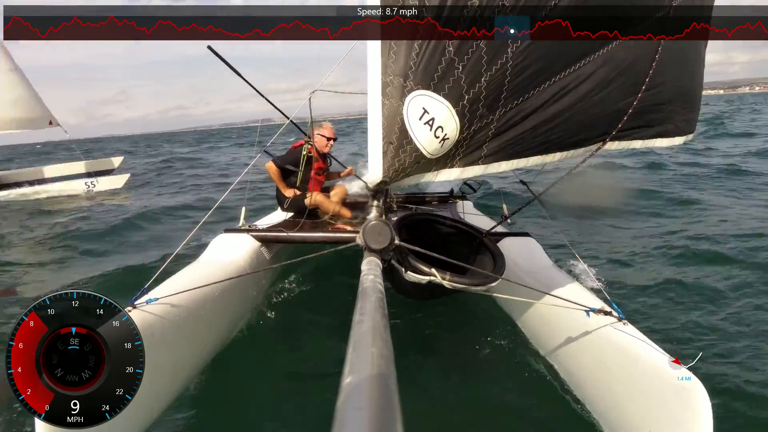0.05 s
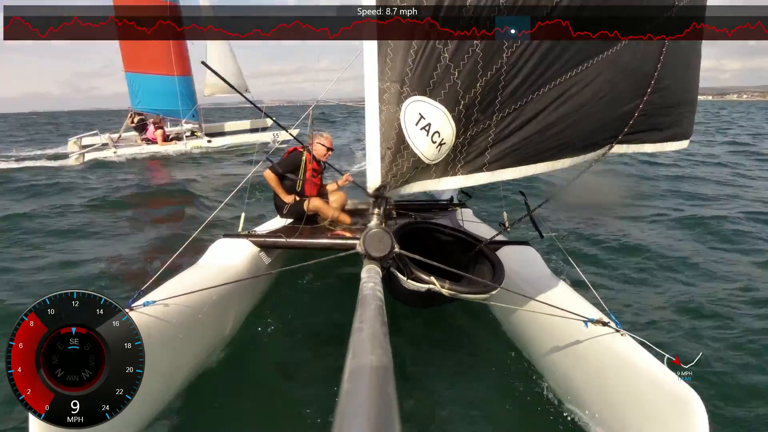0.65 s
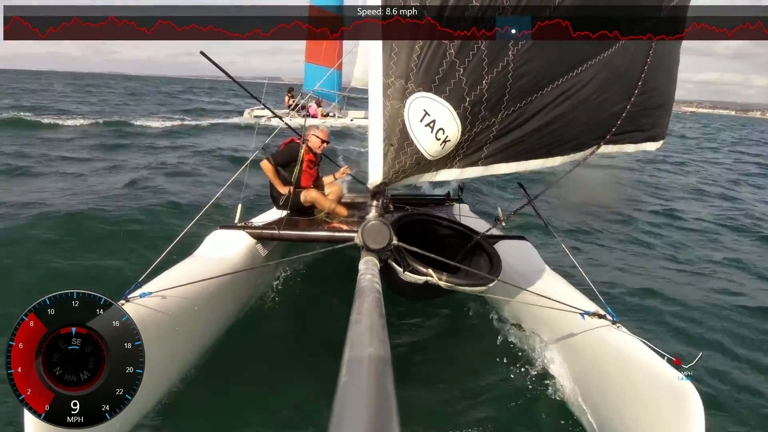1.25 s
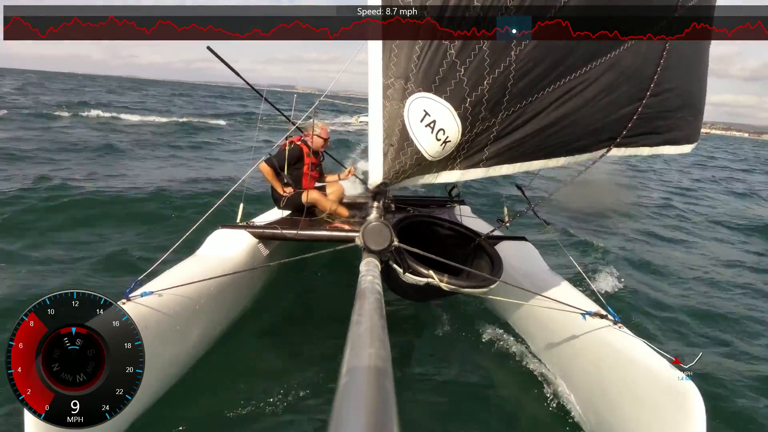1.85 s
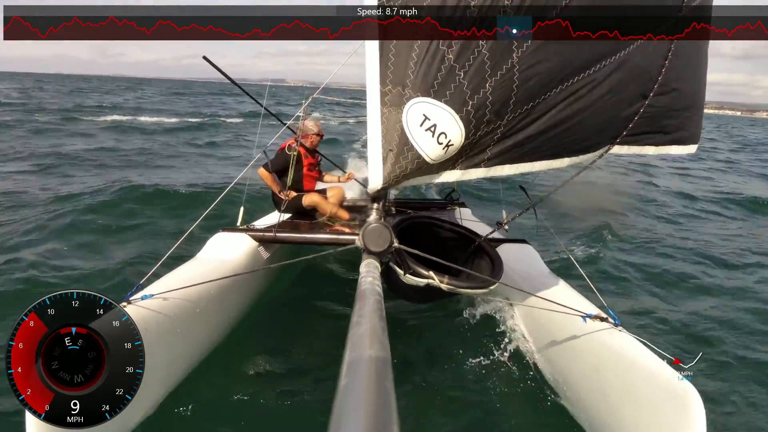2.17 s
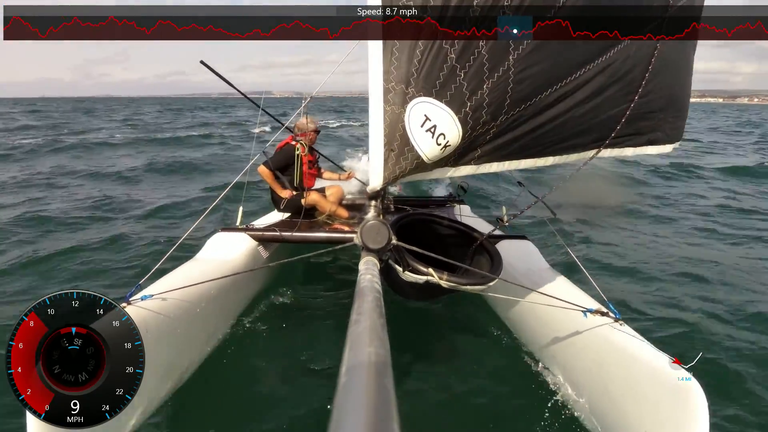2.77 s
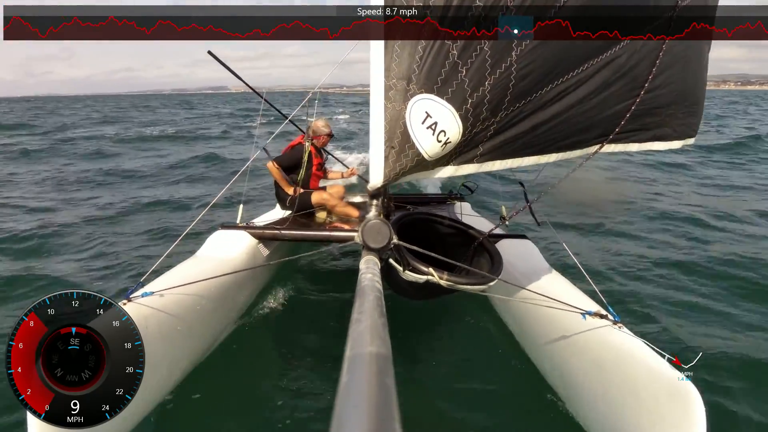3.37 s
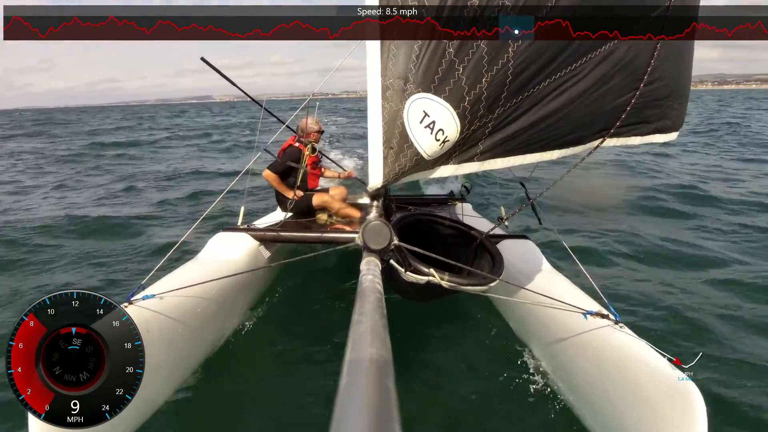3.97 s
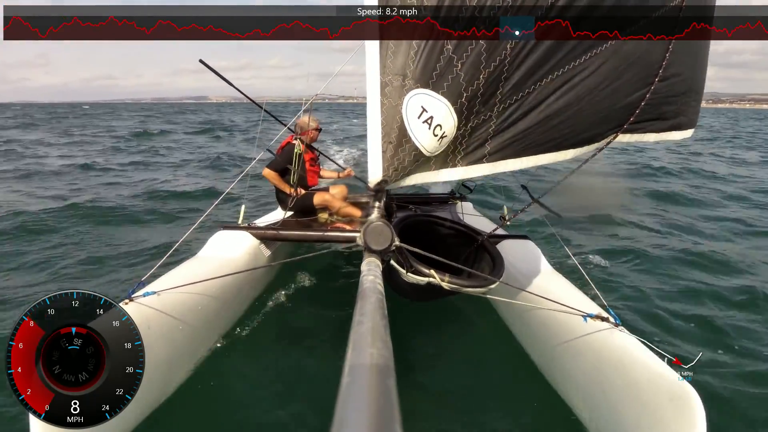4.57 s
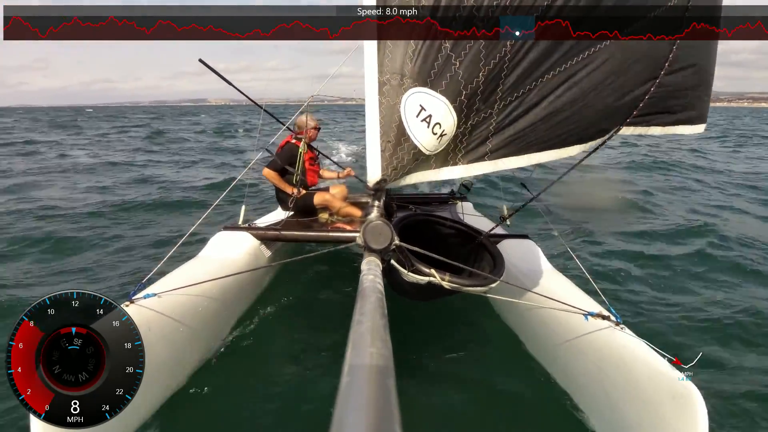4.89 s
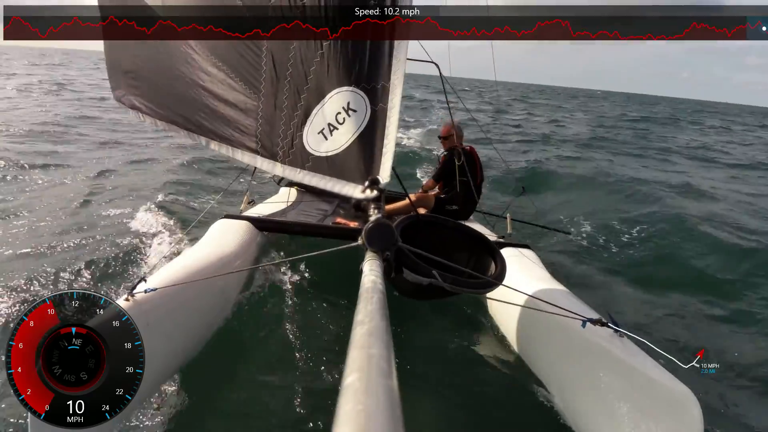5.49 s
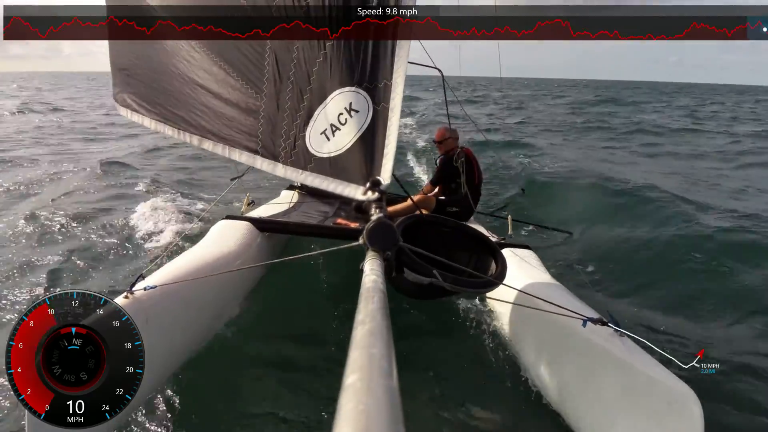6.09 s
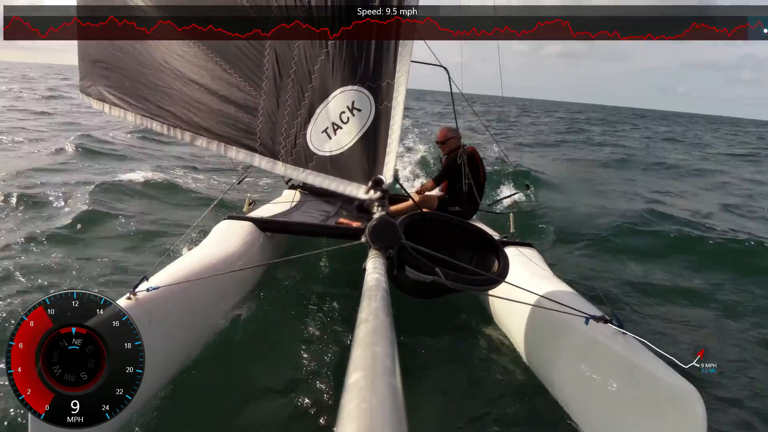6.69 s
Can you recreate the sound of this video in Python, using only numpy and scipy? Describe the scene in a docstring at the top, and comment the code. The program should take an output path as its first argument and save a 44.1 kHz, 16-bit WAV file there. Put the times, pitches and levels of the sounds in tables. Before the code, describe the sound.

Water hits a microphone housing in bursts of hollow, ringing taps and thuds, with low wind rumble and faint sea wash underneath.

```python
"""A small catamaran drives through choppy sea, heard inside a waterproof camera case on a pole between
the bows. At first wind buffets the case and the wash comes through muffled. From 0.5 s to 2.4 s volleys
of spray excite the modes of its shell and heavier lumps thump it on its mount; hard hits overload the
microphone and make its gain control duck. A lull follows, with crests bursting on the hulls and
scattered hits. More volleys land from 5 s to 5.9 s, then wind, wash and a few last hits remain."""
import sys
import numpy as np
from scipy import signal
from scipy.fft import rfft, irfft
from scipy.io import wavfile
from scipy.ndimage import uniform_filter1d

SR = 44100
rng = np.random.default_rng(int(sys.argv[2]) if len(sys.argv) > 2 else 0)


def wav_record(signal):
    """Record a signal, one row per channel, as 16-bit PCM in the file named by sys.argv[1]."""
    frames = np.transpose(np.atleast_2d(signal))
    bounded = np.clip(frames, -1, 1)
    # unit amplitude maps onto the largest positive 16-bit level
    quanta = np.round(bounded * 32767).astype(np.int16)
    wavfile.write(sys.argv[1], SR, quanta)


N = 297229
TIME = np.arange(N) / SR
HIT_TIME = TIME[:SR // 10]
SHELL_HZ = 1138   # nominal pitch, between the two lowest modes of the case wall


def from_db(db):
    """Amplitude ratio of a level in decibels."""
    return 10 ** (np.asarray(db) / 20)


def unit_rms(x):
    """Normalisation to rms 1."""
    return x / np.sqrt(np.mean(x ** 2) + 1e-20)


def unit_height(x, size):
    """Normalisation to amplitude 1 over the strongest `size` samples."""
    return x / np.sqrt(2 * uniform_filter1d(x ** 2, size).max() + 1e-20)


def cut(x, hz, kind, order=2):
    """Causal Butterworth high- or low-pass."""
    return signal.sosfilt(signal.butter(order, hz, kind, fs=SR, output="sos"), x)


def resonance(x, hz, width_hz):
    """Damped oscillator: two poles, gain 1 at the peak."""
    r = np.exp(-np.pi * width_hz / SR)
    feedback = [1, -2 * r * np.cos(2 * np.pi * hz / SR), r * r]
    return signal.lfilter(np.array([1, 0, -1]) * (1 - r * r) / 2, feedback, x + 1e-18)


def drift(corner_hz):
    """Slow random fluctuation: low-passed noise, rms 1."""
    hz = np.arange(N // 2 + 1) * SR / N
    return unit_rms(irfft(rfft(rng.standard_normal(N)) / (1 + (hz / corner_hz) ** 2), N))


def noise(spectrum):
    """Spectrally shaped noise, rms 1."""
    hz, db = np.transpose(spectrum)
    bins = np.arange(1, N // 2 + 2) * SR / N
    gain = from_db(np.interp(np.log(bins), np.log(hz), db, left=-120, right=-120))
    return unit_rms(irfft(rfft(rng.standard_normal(N)) * gain, N))


def impulses(per_s, spread_db=0.0):
    """Poisson process: impulses of either sign, 0 to 2 * spread_db above unit size."""
    sizes = from_db(spread_db * np.minimum(rng.exponential(1, N), 2)) * rng.choice([-1, 1], N)
    return sizes * (rng.random(N) < per_s / SR)


def in_time(curve):
    """Linear interpolation of a curve at every sample."""
    return np.interp(TIME, *np.transpose(curve))


def swells(rows):
    """Sum of Gaussian envelopes, each at 1/e one half duration from its peak."""
    return sum(from_db(db) * np.exp(-((TIME - s) / half_s) ** 2) for s, db, half_s in rows)


def held_excess_db(x, threshold_db, share, fall_db_per_s):
    """Peak hold with linear decay, on a share of the level above a threshold."""
    level_db = 10 * np.log10(np.maximum(uniform_filter1d(x ** 2, size=220), 1e-12))
    excess_db = share * np.maximum(level_db - threshold_db, 0)
    fall_db = fall_db_per_s * TIME
    return np.maximum.accumulate(excess_db + fall_db) - fall_db


def add(out, s, sound):
    """Superposition of a sound at time s."""
    start = max(round(s * SR), 0)
    out[start:start + len(sound)] += sound[:N - start]


def impact(contact_s, runoff_s, spatter_db, rise_s=0.00081, spatter_s=0.0061):
    """Momentum transfer from landing water: a force that builds, churns, then decays into spatter."""
    build = np.minimum(HIT_TIME / rise_s, 1) ** 2
    after = np.maximum(HIT_TIME - rise_s - contact_s, 0)
    decay = np.exp(-after / runoff_s) + from_db(spatter_db) * np.exp(-after / spatter_s)
    return build * decay * rng.standard_normal(len(HIT_TIME))


def shell(force, hz, width_hz):
    """Forced vibration of the case wall: a main mode below hz and a weaker one above."""
    main = resonance(force, hz * 0.932, width_hz)
    partner = from_db(-9) * resonance(force, hz * 1.168, 327)
    return cut(cut(main - partner, 802, "high", order=4), 1850, "low", order=3)


def crack(force):
    """Modal sum of the higher resonances; transmission loss in the wall removes the treble."""
    # higher modes of the case: f/Hz, bandwidth/Hz, relative level/dB
    case_modes = [(1750, 266, 4.5), (2090, 270, 10), (2605, 580, 4.5), (2883, 270, 5.5), (3420, 1200, 3),
                  (4060, 1600, -2.5), (6000, 800, -34)]
    ringing = sum((-1) ** k * from_db(db) * resonance(force, hz, width)
                  for k, (hz, width, db) in enumerate(case_modes))
    return cut(cut(ringing, 1550, "high", order=3), 2955, "low", order=5)


def swing(force, hz, width_hz):
    """Mass on a spring: the case swings for a few cycles on its mount."""
    motion = cut(resonance(force, hz, width_hz), 452, "low", order=4)
    return unit_height(cut(motion, 55, "high"), size=176)


def wind():
    """Turbulent pressure: gusts and puffs rumble while smaller eddies shake the case."""
    # gusts on the pole and shaking of the case: t/s, relative level/dB
    gusts = [(0.0, -43.5), (0.73, -33), (1.14, -31.5), (1.29, -62.5), (1.54, -38), (1.9, -36), (2.1, -39),
             (2.27, -45), (3.0, -44.5), (3.21, -40), (3.75, -44.5), (4.05, -50.5), (4.8, -46),
             (5.09, -24.5), (5.27, -33.5), (5.63, -35), (6.51, -38.5), (6.74, -45)]
    shaking = [(0.0, -37.5), (0.58, -35), (0.79, -26), (1.16, -27.5), (1.31, -36.5), (1.69, -32.5),
               (1.9, -24.5), (2.08, -22), (2.29, -30), (2.98, -39), (3.6, -37), (4.77, -34.5), (5.16, -27),
               (5.46, -16), (5.69, -21), (5.84, -30), (6.21, -32.5), (6.74, -31.5)]
    # puffs booming on the case: t/s, level/dB, half duration/s
    puffs = [(.21, -30, .03), (.65, -16, .025), (4.32, -24.5, 0.027), (4.47, -20.5, 0.01),
             (6.71, -23, 0.071)]
    # spectra of gusts and eddies: f/Hz, relative level/dB
    rumble_spectrum = [(20, -33), (32, -27.5), (42, -26.5), (55, -17.5), (72, -20), (92, -0.5), (120, -2),
                       (160, -7), (250, -23)]
    buffet_spectrum = [(90, -31.5), (125, -5.5), (160, 1.5), (195, -3.5), (230, 2), (290, -19.5),
                       (365, -7.5), (450, -24), (600, -27), (850, -33), (1300, -52)]
    rumble = (from_db(in_time(gusts) + 5 + 1.5 * drift(15)) + swells(puffs)) * noise(rumble_spectrum)
    buffet = from_db(in_time(shaking) + 2 + 3 * drift(27)) * noise(buffet_spectrum)
    return rumble + buffet


def bubbles(per_s=420, quality=7):
    """Bubble resonance: air beaten into the bow waves rings briefly, each size at its own pitch."""
    births = impulses(per_s)
    pitches_hz = np.geomspace(1150, 3000, 20)
    size_class = rng.integers(0, len(pitches_hz), N)
    rings = sum(resonance(births * (size_class == k), hz, hz / quality) / hz
                for k, hz in enumerate(pitches_hz))
    return unit_rms(cut(rings, 3600, "low", order=4))


def rushing_water():
    """Flow noise coloured by the case's resonances: the bow waves churn, the wake fizzes steadily."""
    # vigour of the bow waves and drone of the wash in the shell: t/s, relative level/dB
    rush = [(0, -62), (.35, -62), (.9, -54.5), (1.2, -66), (1.45, -67.5), (1.56, -57), (2.05, -54),
            (2.33, -64.5), (2.5, -57), (2.7, -58), (2.82, -64.5), (3.3, -63.5), (3.6, -68), (4.25, -64),
            (4.95, -68), (5.45, -53.5), (5.72, -73), (5.92, -62), (6.14, -59), (6.74, -60)]
    drone = [(0, -45.5), (.35, -50.5), (.55, -47), (1.0, -36.5), (1.55, -47), (2.0, -40.5), (2.4, -48),
             (3.25, -50.5), (3.55, -43.5), (4.05, -55), (4.4, -50), (4.9, -47.5), (5.45, -38), (5.95, -51),
             (6.74, -46.5)]
    # water spectra inside the case: f/Hz, relative level/dB
    wash_spectrum = [(500, -11), (840, -22), (930, -4.5), (1010, 12), (1130, -1), (1300, -3), (1600, -33.5),
                     (2200, -41.5)]
    splash_spectrum = [(1150, -20), (1350, -7.5), (1600, -16), (1750, 5.5), (1900, -0.5), (2120, 9),
                       (2350, 2.5), (2600, -16.5), (3100, -9), (3600, -20)]
    foam_spectrum = [(2200, -16), (2700, -2.5), (3300, 2), (3600, -0.5), (3950, 6.5), (4300, 0.5),
                     (4700, -8), (5500, -13.5), (6800, -16.5), (8000, -26), (11000, -34.5), (16000, -49)]
    churn = drift(25)
    rush_db = in_time(rush)
    splash_db = -58.5 + 0.55 * (rush_db - rush_db.mean())
    wash = from_db(in_time(drone) + 3.5 * churn) * noise(wash_spectrum)
    splash = from_db(splash_db + 4 * churn) * noise(splash_spectrum)
    foam = from_db(rush_db - 0.85 + 3.1 * churn + 0.9 * drift(120)) * noise(foam_spectrum)
    wake = from_db(-69) * noise(foam_spectrum)
    return wash + splash + foam + wake + from_db(splash_db - 1) * bubbles()


def water_film(spray):
    """Transmission loss as a gain: heavy hits leave a film that dims the sea until it drains."""
    loss_db = held_excess_db(spray, threshold_db=-26, share=0.18, fall_db_per_s=77.5)
    return from_db(-uniform_filter1d(loss_db, size=440))


def crests(hollow_hz=2180, width_hz=230, ragged_db=3.5):
    """Broadband excitation: a crest bursts on a hull and rings the shell and a hollow mode of the case."""
    # bursting crests: t/s, relative level/dB, half duration/s
    bursts = [(2.194, -46, 0.1), (2.441, -48, 0.031), (2.653, -50, 0.057), (2.723, -44, 0.045),
              (4.752, -38.5, 0.043)]
    hiss = rng.standard_normal(N)
    hollow = resonance(resonance(hiss, hollow_hz, width_hz), hollow_hz, 4 * width_hz)
    hollow = unit_rms(cut(hollow, 4200, "low", order=4))
    ring = from_db(0.5) * unit_rms(shell(hiss, SHELL_HZ, width_hz=130))
    return swells(bursts) * from_db(ragged_db * drift(70)) * (hollow + ring)


def patter(rise_s=0.025, fall_s=0.016, stray_db=-54):
    """Shot noise: small drops ring the case, loudly in volleys and faintly as strays between them."""
    # showers as a bow digs into a wave: start t/s, end t/s, level/dB
    volleys = [(0.518, .70, -42), (0.924, 1.09, -22.5), (1.15, 1.31, -35), (1.38, 1.49, -43),
               (1.798, 2.28, -38.5), (4.193, 4.32, -51), (4.918, 5.28, -53), (5.345, 5.6, -26),
               (5.62, 5.75, -29)]
    arrivals = impulses(per_s=55, spread_db=6)
    drop_envelope = impact(0.0024, runoff_s=0.0016, spatter_db=-24) ** 2
    force = signal.fftconvolve(arrivals, drop_envelope)[:N] * rng.standard_normal(N)
    ringing = unit_rms(shell(force, SHELL_HZ, width_hz=190)) + from_db(-11.5) * unit_rms(crack(force))
    shower = np.zeros(N)
    for start, end, db in volleys:
        rise = np.clip((TIME - start) / rise_s, 0, 1)
        fall = np.exp(-np.maximum(TIME - end, 0) / fall_s)
        shower += from_db(db) * rise * fall
    return (shower + from_db(stray_db)) * ringing


def ticks():
    """Light impacts: fine fast drops carry too little momentum to move the shell and only tick."""
    # fine drops: t/s, relative level/dB
    drops = [(0.809, -26), (3.091, -17), (5.0533, -26), (5.1173, -20), (5.1355, -19), (5.3555, -21),
             (5.4231, -24), (5.576, -28)]
    out = np.zeros(N)
    for s, db in drops:
        force = impact(0.0012, runoff_s=0.0012, spatter_db=-27)
        tick = cut(cut(resonance(force, 4300, width_hz=2600), 3000, "high"), 8000, "low")
        add(out, s, from_db(db - 15.5) * unit_height(tick, size=44))
    return out


def thumps(lead_s=0.00203):
    """Shock excitation: heavy water sets the case swinging on its mount; the shell rings faintly too."""
    # heavy lumps of water: t/s, relative level/dB, nominal contact time/s, swing f/Hz
    lumps = [(.575, -12.5, 0.05, 283), (0.648, 0.5, 0.015, 161), (0.6587, -2.5, 0.0086, 280),
             (0.7796, 0, 0.0026, 227), (0.8055, 3.5, 0.0094, 192), (0.8317, 1.5, 0.009, 300),
             (0.881, -10, 0.014, 310), (0.9327, 3, 0.0038, 357), (.9507, 3, 0.0017, 238),
             (0.9784, -3.5, .002, 288), (1.0465, 6, 0.0053, 301), (1.0696, -3, 0.0092, 226),
             (1.1621, -3.5, 0.0052, 353), (1.1894, -6, .006, 370), (1.262, -6, 0.015, 201),
             (1.3076, -8, 0.011, 264), (1.3685, -11.5, 0.0095, 255), (1.7158, -9.5, .005, 262),
             (1.9276, -0.5, 0.0015, 245), (1.992, -5.5, 0.013, 170), (2.0349, -6.5, 0.0077, 256),
             (2.0935, -4.5, .002, 208), (2.128, -6, .004, 194.5), (2.2397, -2, 0.0017, 254),
             (2.2541, -6.5, 0.006, 247), (2.3054, -7.5, .004, 326), (2.71, -19, 0.027, 306),
             (3.0377, -10.5, 0.0018, 274), (3.086, -17.5, 0.015, 244), (3.7942, -12.5, 0.024, 267),
             (3.8793, -13.5, 0.0025, 325), (4.0744, -9, 0.016, 275), (4.2153, -7, 0.013, 221),
             (4.306, -17.5, 0.013, 202), (4.945, -7.5, 0.022, 233), (5.013, -8, .006, 354),
             (5.0501, 0, 0.0063, 191), (5.1171, 0, 0.0029, 240), (5.212, -9, 0.011, 159),
             (5.2992, -3.5, 0.0041, 269), (5.3526, 8, 0.027, 195), (5.4663, 1, 0.0021, 276),
             (5.4932, 8.5, 0.0027, 320), (5.5113, 3.5, 0.0094, 194), (5.582, -4, 0.0023, 247),
             (5.6191, -0.5, 0.0031, 298), (5.69, -2.5, 0.0018, 310), (5.8379, -5, .01, 176),
             (6.1137, -12, 0.013, 197), (6.63, -17, 0.021, 328)]
    out = np.zeros(N)
    for s, db, contact_s, hz in lumps:
        force = impact(contact_s * 1.08, runoff_s=0.0059, spatter_db=-17)
        force[0] += 32   # the first blow, before the churning
        ring = shell(impact(0.00059, runoff_s=0.0033, spatter_db=-19), 1100, width_hz=310)
        add(out, s - lead_s, from_db(db - 2.5) * swing(force, hz, width_hz=65))
        add(out, s, from_db(db - 18.5) * unit_height(ring, size=88))
    return out


def slaps(hz_per_db=3.0, scatter=0.019, lead_s=0.001305, fringe_s=0.0077):
    """Impact excitation of modes: each lump of spray rings, cracks, pushes and sways the case."""
    # lumps of spray: t/s, relative level/dB, nominal contact time/s, crack level/dB re the shell
    lumps = [(0.563, -25.5, 0.0017, -18), (0.6151, -23, 0.0013, -9.5), (0.6518, -13, .001, -33),
             (0.669, 4, 0.0046, -13.5), (0.6964, -5.5, 0.0091, -10), (0.7783, -24, 0.0017, -28),
             (0.8056, -8, 0.0013, -21), (0.828, 1.5, 0.0077, -3), (0.8522, -1.5, 0.0015, -8.5),
             (0.8609, -5.5, 0.00065, -5), (0.931, -5, 0.0046, -10), (0.978, -13, 0.00081, -31),
             (1.0041, -2, .006, -1.5), (1.045, -9.5, .002, -16), (1.075, 6.5, 0.00067, -11),
             (1.097, -13, 0.0037, -12.5), (1.159, -6, 0.0014, -22), (1.1878, -13.5, 0.0024, -2),
             (1.2062, -9.5, 0.0028, -12), (1.2365, -10.5, 0.0015, -31), (1.2669, -7, 0.0029, -6),
             (1.2853, -5.5, 0.00036, -17), (1.291, -1, 0.0015, -5.5), (1.31, -8, 0.0024, 2),
             (1.3198, -10.5, 0.0028, -1.5), (1.3704, -8.5, .001, -22), (1.3947, -5, 0.0035, -17),
             (1.4358, -7.5, 0.00075, -15), (1.4557, -12.5, 0.0014, -16), (1.4832, -10.5, 0.0022, -17),
             (1.7168, -6, 0.0046, -18), (1.7884, -4, 0.00027, -10.5), (1.8414, -9, 0.00065, -21),
             (1.854, -6, 0.00095, -16), (1.8762, -4.5, 0.0036, -3.5), (1.933, 1.5, 0.0026, -7),
             (2.0323, 2, 0.00089, -17), (2.039, 0.5, 0.0021, -12), (2.062, -12.5, 0.0037, -41),
             (2.087, -9.5, 0.00078, -11), (2.1257, -4.5, 0.0043, -18), (2.111, -24, .001, -6),
             (2.2159, -9.5, 0.00063, -22), (2.228, 5.5, 0.0054, -10.5), (2.253, -1, 0.0033, -9.5),
             (2.2676, -5, 0.0023, -14), (2.3044, -8, 0.0015, -18), (2.422, -16.5, .001, -22),
             (2.4348, -15, 0.0013, -24.5), (2.7054, -23, 0.008, -17), (2.9466, -26.5, 0.002, -29),
             (3.0371, -13.5, 0.0013, -9), (3.0878, -1.5, 0.0046, -11), (3.235, -31.5, 0.0015, -25),
             (3.5776, -32.5, 0.0012, -3.5), (3.7937, -1, 0.0048, -10), (3.831, -5.5, 0.00059, -19),
             (3.8354, 1, 0.0021, -16), (3.9119, -14.5, 0.00035, -32), (4.196, -18, 0.0012, -20),
             (4.206, -11.5, 0.0015, -7), (4.2228, -15.5, 0.00092, -26), (4.2467, -12.5, 0.0011, -22),
             (4.32, -7.5, 0.0022, -14.5), (4.392, -27, 0.00089, -33), (4.4929, -21, 0.0013, -17),
             (5.012, -13, 0.0046, -7), (5.0543, -9.5, 0.0037, -11.5), (5.0693, 1, 0.0053, -8.5),
             (5.1192, -8.5, 0.00057, -7), (5.1442, -5.5, 0.011, -4.5), (5.24, 0, 0.0018, -11),
             (5.264, -14.5, 0.0025, -14), (5.2998, -8, 0.0018, -2.5), (5.36, -17, 0.0021, -7),
             (5.3682, -11.5, 0.011, -11.5), (5.436, -4.5, 0.0031, -5), (5.4577, -12, .001, -19),
             (5.4927, -3.5, 0.0069, -9), (5.5119, 0.5, 0.00089, -31), (5.5203, 2, .004, -5),
             (5.549, -16, 0.0021, -13), (5.565, -19, 0.0037, -14), (5.5888, 0.5, 0.0032, -7.5),
             (5.656, 7, 0.0036, -20), (5.6189, -17, 0.0014, -5), (5.69, -15, 0.0011, -22),
             (5.746, -9.5, 0.0017, 1), (5.817, 1.5, 0.0082, -4), (5.8487, -10.5, 0.0048, -2),
             (5.8555, -2, 0.00089, -17), (5.9917, -19.5, 0.0026, -19), (6.046, -14, 0.0005, -36),
             (6.1178, -32, 0.023, -11), (6.47, -21.5, .001, -18.5), (6.5818, -21, 0.00055, -20)]
    out = np.zeros(N)
    for s, db, contact_s, crack_db in lumps:
        # harder hits ring higher, and the pitch varies with the spot struck
        hz = (SHELL_HZ + hz_per_db * db) * (1 + scatter * rng.standard_normal())
        force = impact(contact_s * 1.406, runoff_s=0.0016, spatter_db=-16.5)
        sharp_force = impact(contact_s * 1.01, runoff_s=0.00096, spatter_db=-18.5)
        ring = unit_height(shell(force, hz, width_hz=116.6), size=88)
        snap = from_db(crack_db) * unit_height(crack(sharp_force), size=88)
        push = from_db(-8) * unit_height(cut(resonance(force, 335, width_hz=91), 810, "low"), size=176)
        sway = from_db(-12 + 0.54 * db) * swing(force, 255, width_hz=43)
        add(out, s - lead_s, from_db(db) * (ring + snap + push) + sway)
        # the ragged fringe of a lump lands just ahead of its core
        fringe = shell(impact(fringe_s, runoff_s=0.00062, spatter_db=-22.5), hz, width_hz=650)
        add(out, s - fringe_s, from_db(db - 28.5) * unit_height(fringe, size=88))
    return out


def scene():
    """Superposition of spray, sea and wind at the one microphone inside the case."""
    spray = slaps() + thumps() + ticks() + patter()
    sea = rushing_water() * water_film(spray) + crests()
    return (sea + wind() + spray)[None]


def gain_control(x, attack_s=0.063):
    """Compression: loud hits pull the gain down, too late to save their front; it then creeps back."""
    duck_db = held_excess_db(x[0], threshold_db=-15.5, share=0.41, fall_db_per_s=42.5)
    r = np.exp(-1 / (attack_s * SR))
    return x * from_db(-signal.lfilter([1 - r], [1, -r], duck_db))


def record(dry, ceiling=0.72, knee=4.9, cutoff_hz=16000):
    """Saturation: after the gain control, hard hits flatten at the microphone's ceiling; the top is cut."""
    ducked = gain_control(dry)
    clipped = ducked / (1 + np.abs(ducked / ceiling) ** knee) ** (1 / knee)
    return signal.sosfilt(signal.ellip(10, .1, 80, cutoff_hz, fs=SR, output="sos"), clipped)


dry = scene()
out = record(dry)
wav_record(out)
```